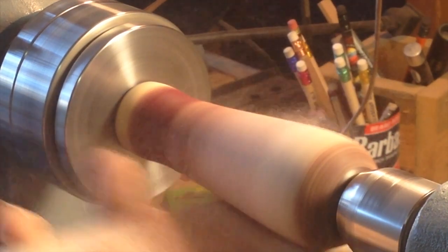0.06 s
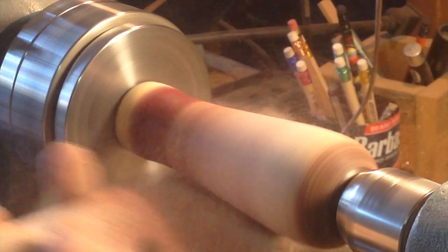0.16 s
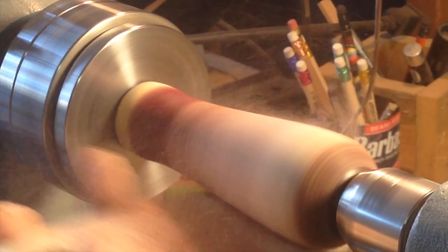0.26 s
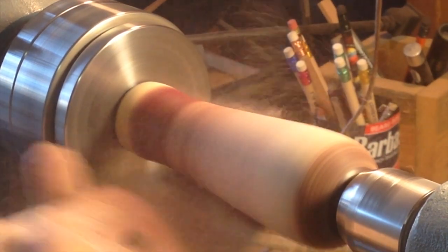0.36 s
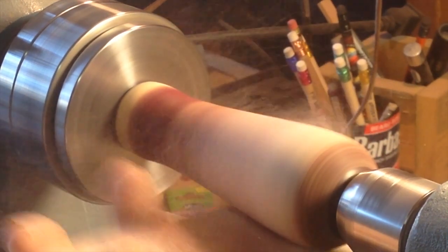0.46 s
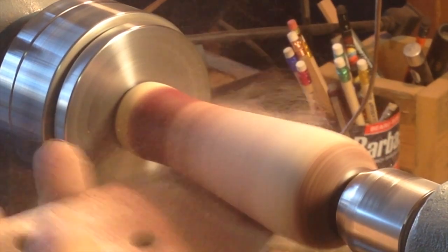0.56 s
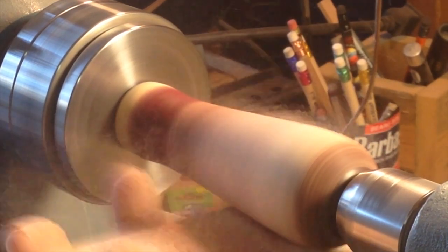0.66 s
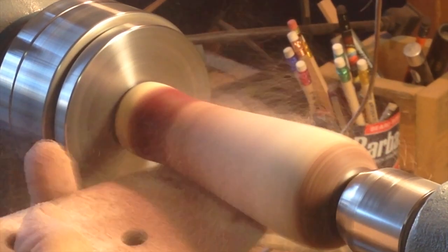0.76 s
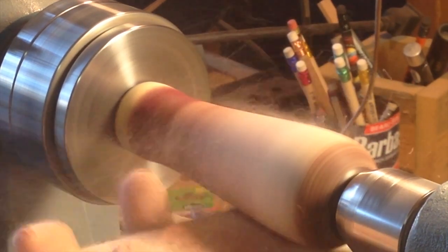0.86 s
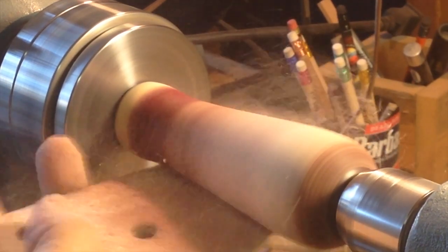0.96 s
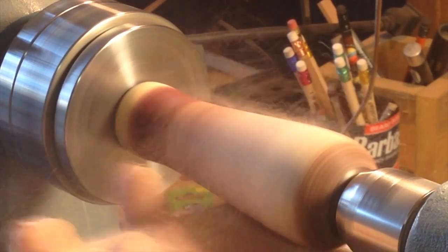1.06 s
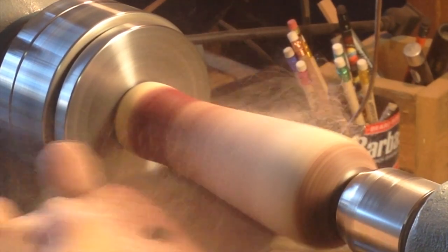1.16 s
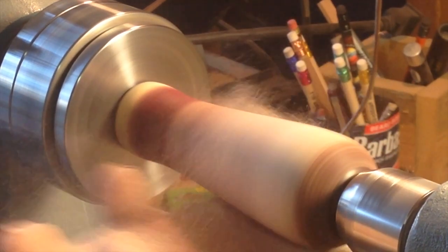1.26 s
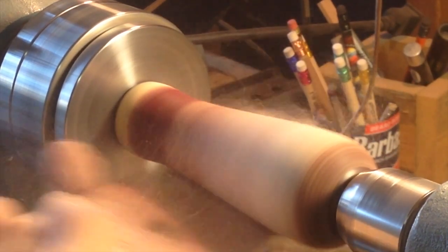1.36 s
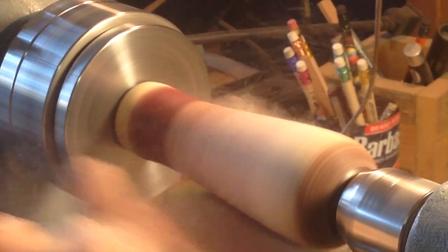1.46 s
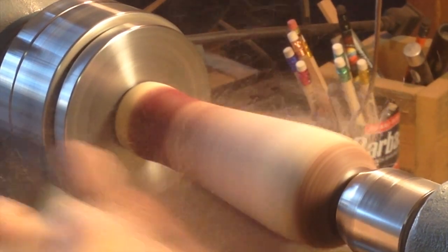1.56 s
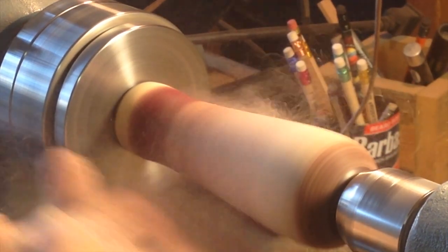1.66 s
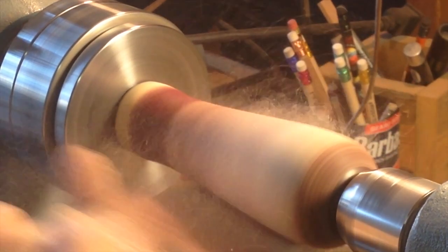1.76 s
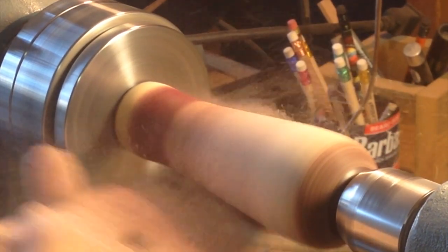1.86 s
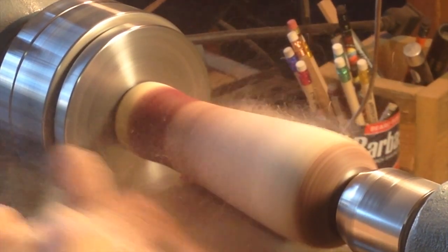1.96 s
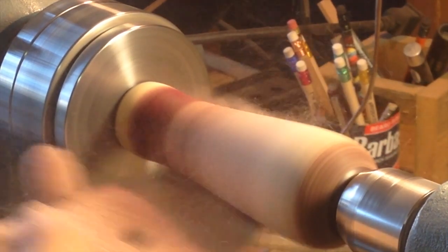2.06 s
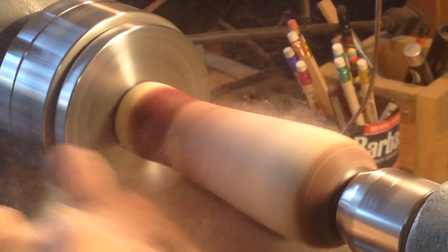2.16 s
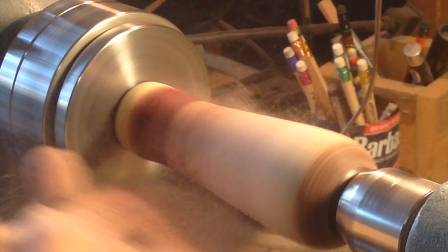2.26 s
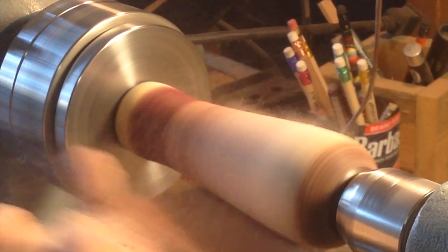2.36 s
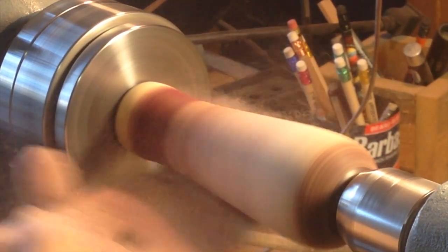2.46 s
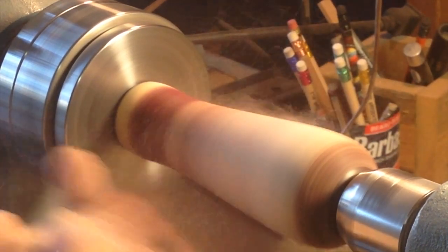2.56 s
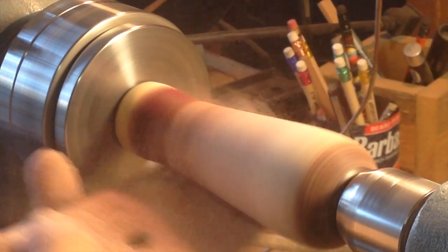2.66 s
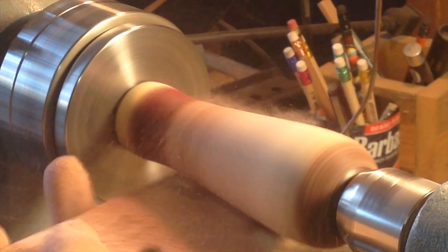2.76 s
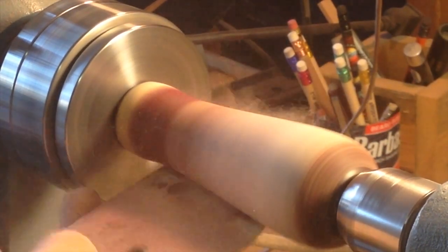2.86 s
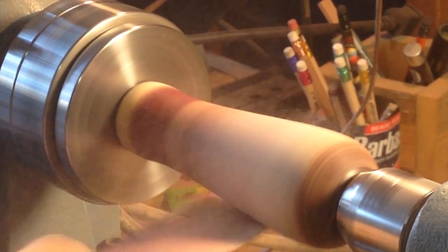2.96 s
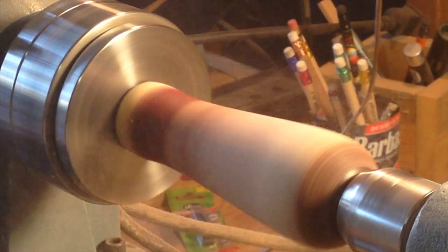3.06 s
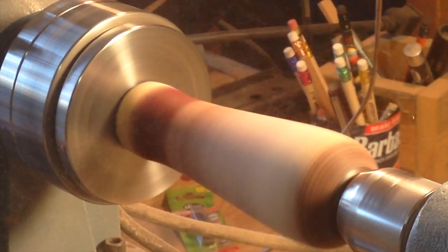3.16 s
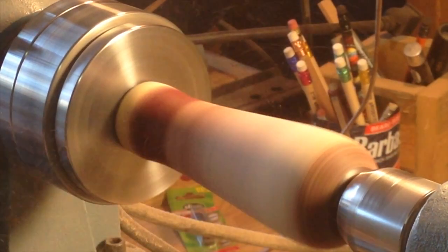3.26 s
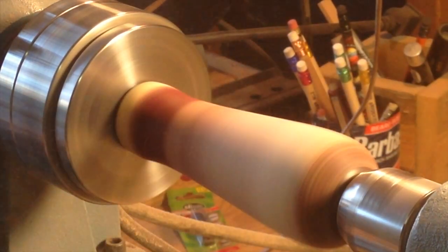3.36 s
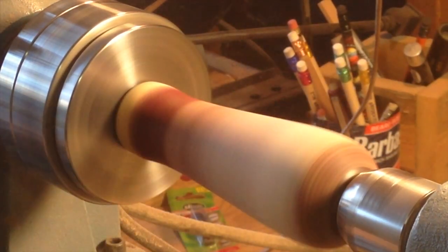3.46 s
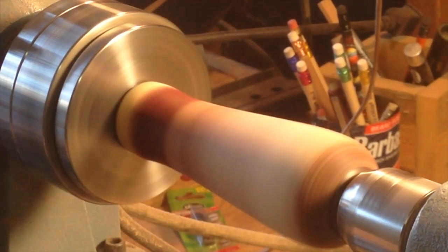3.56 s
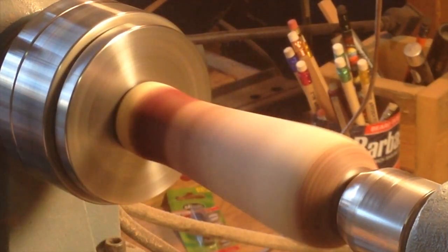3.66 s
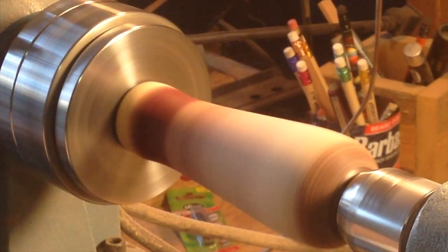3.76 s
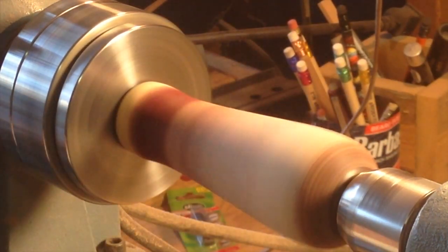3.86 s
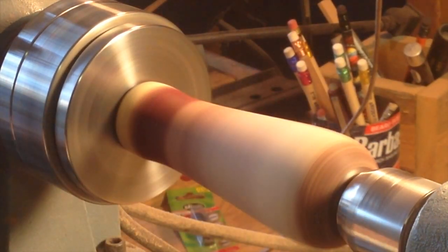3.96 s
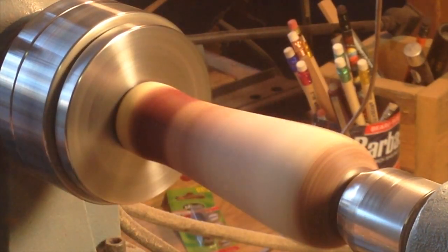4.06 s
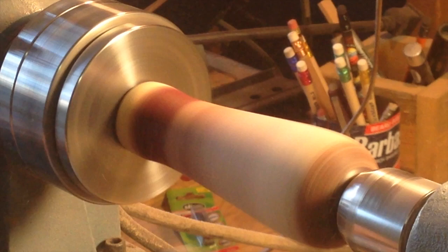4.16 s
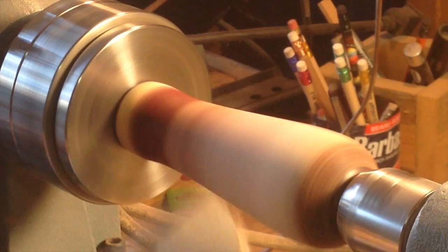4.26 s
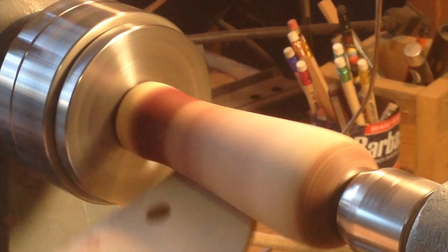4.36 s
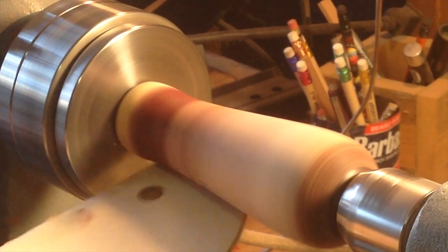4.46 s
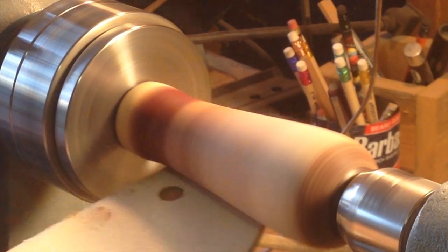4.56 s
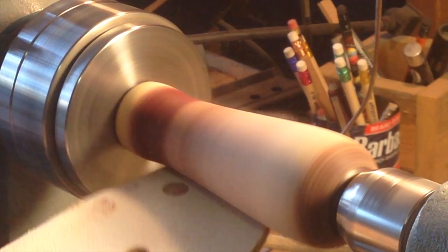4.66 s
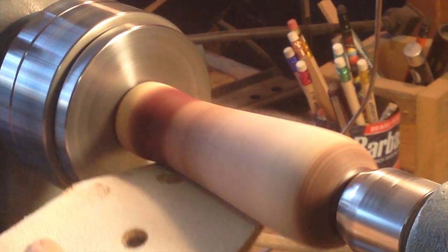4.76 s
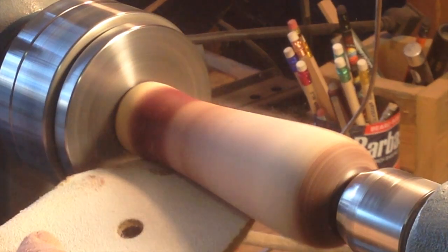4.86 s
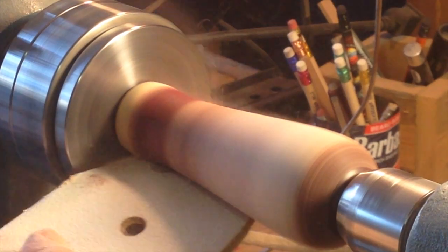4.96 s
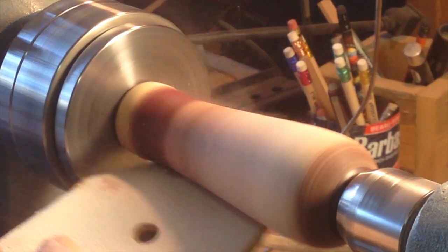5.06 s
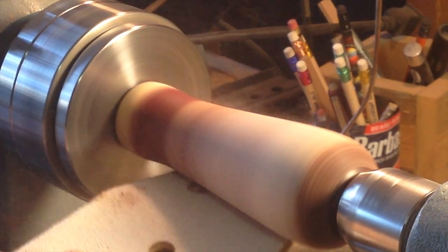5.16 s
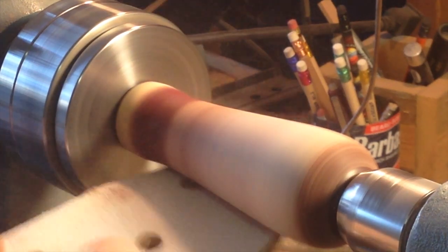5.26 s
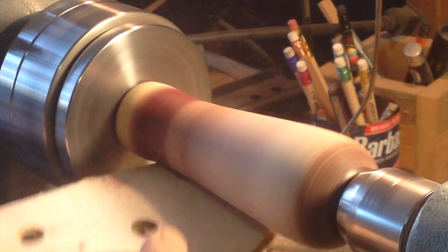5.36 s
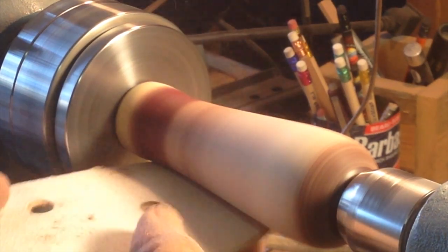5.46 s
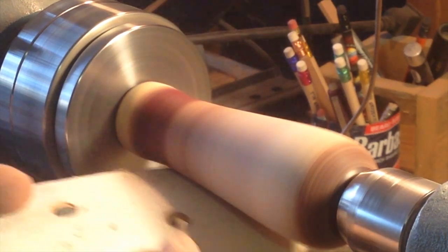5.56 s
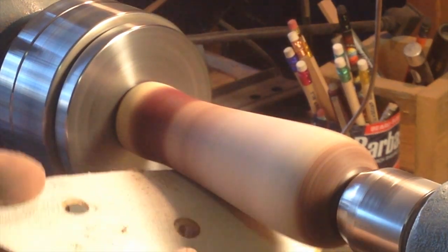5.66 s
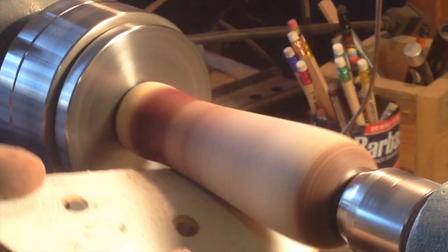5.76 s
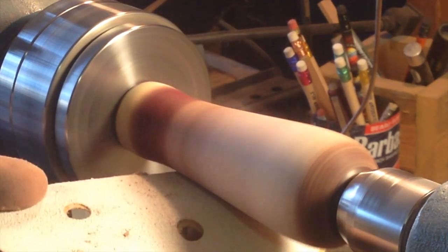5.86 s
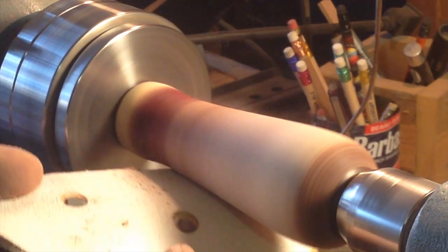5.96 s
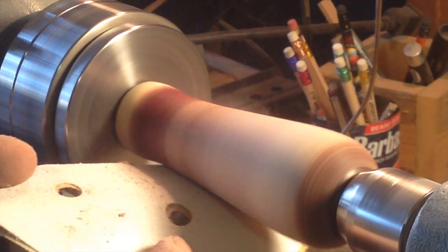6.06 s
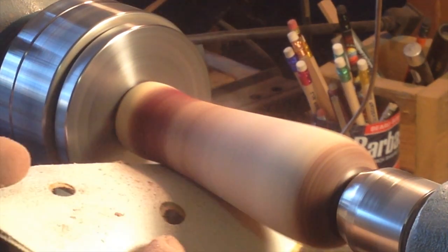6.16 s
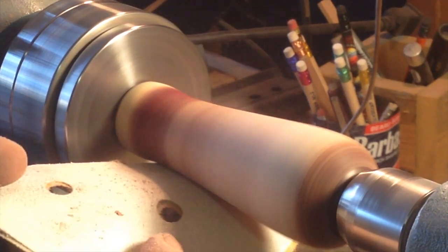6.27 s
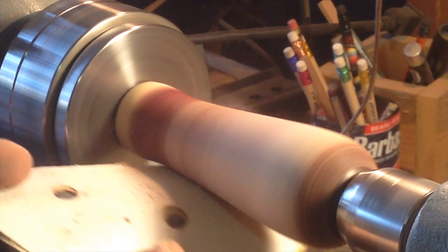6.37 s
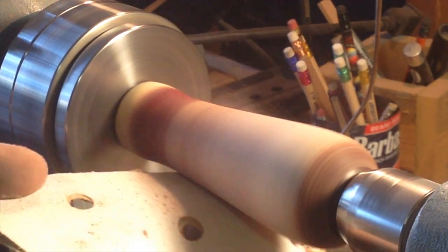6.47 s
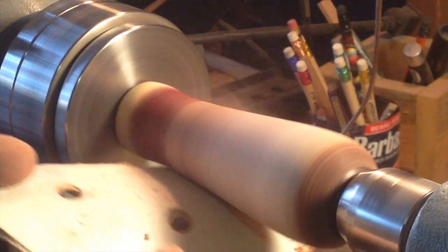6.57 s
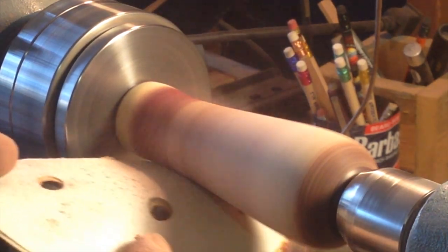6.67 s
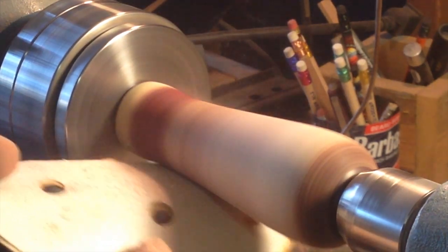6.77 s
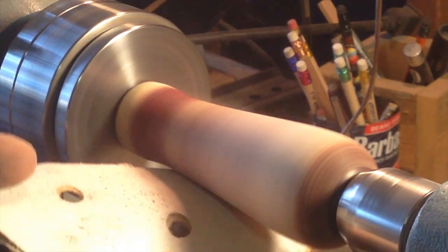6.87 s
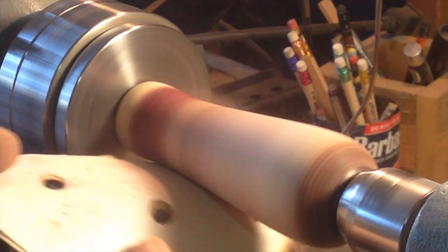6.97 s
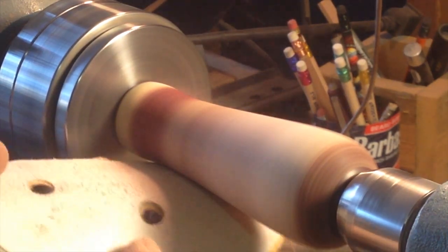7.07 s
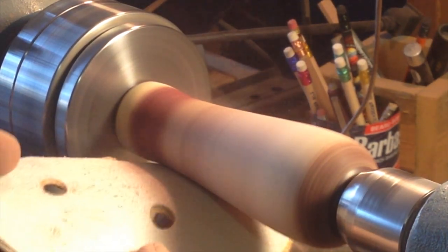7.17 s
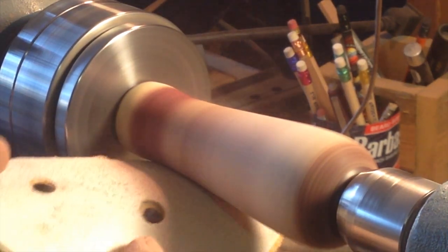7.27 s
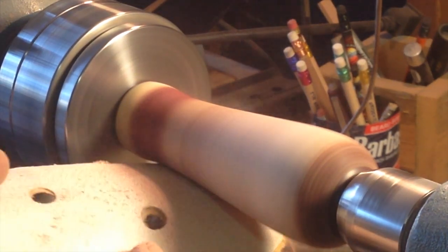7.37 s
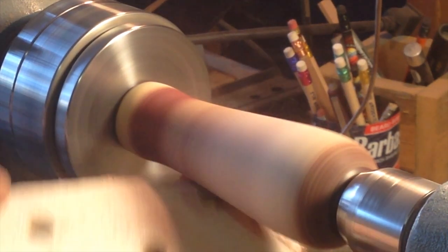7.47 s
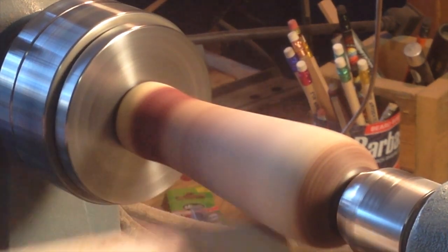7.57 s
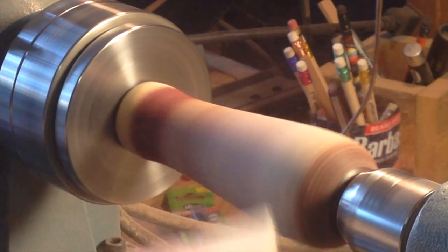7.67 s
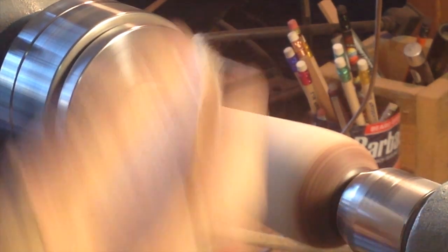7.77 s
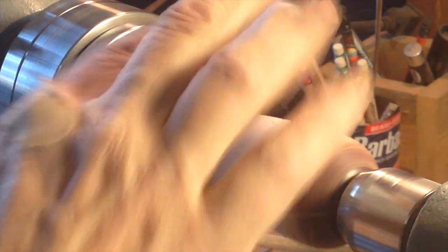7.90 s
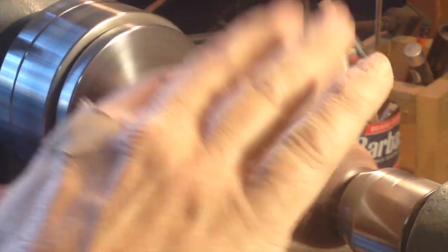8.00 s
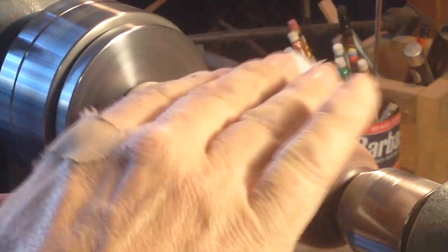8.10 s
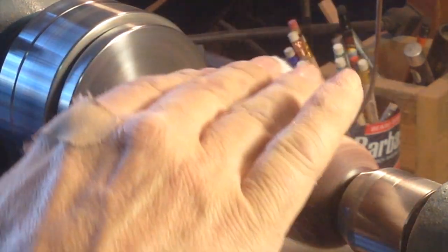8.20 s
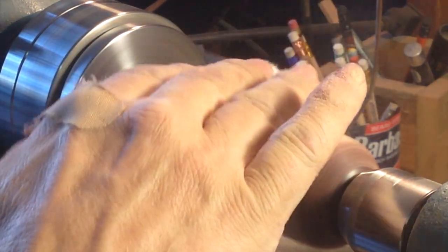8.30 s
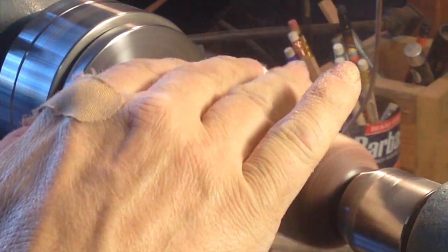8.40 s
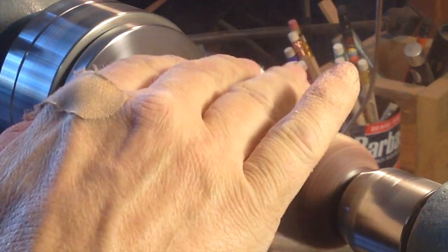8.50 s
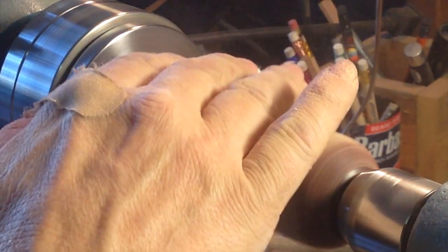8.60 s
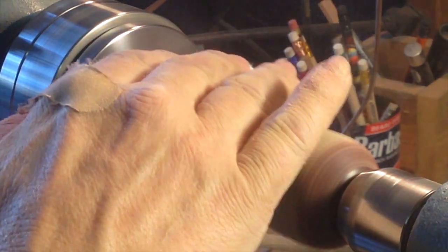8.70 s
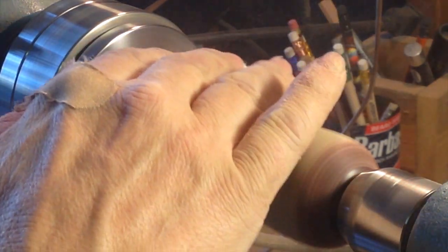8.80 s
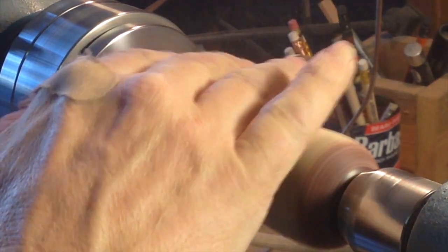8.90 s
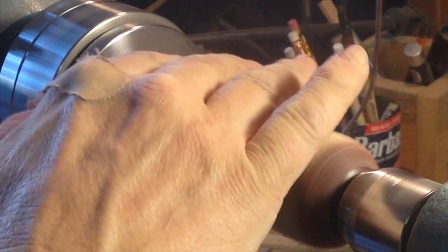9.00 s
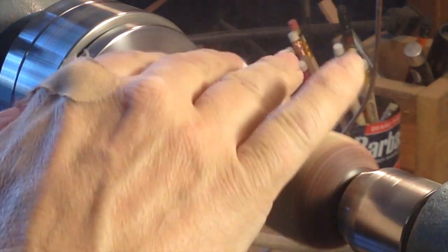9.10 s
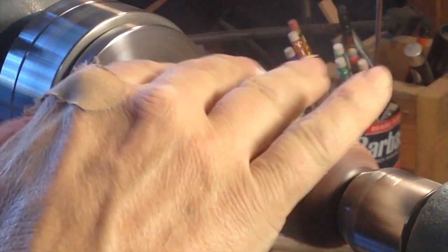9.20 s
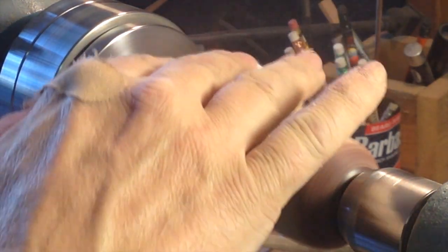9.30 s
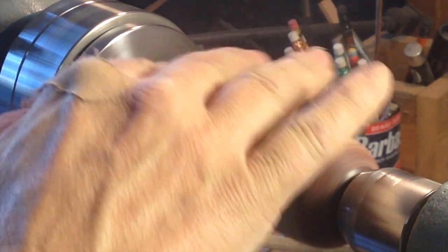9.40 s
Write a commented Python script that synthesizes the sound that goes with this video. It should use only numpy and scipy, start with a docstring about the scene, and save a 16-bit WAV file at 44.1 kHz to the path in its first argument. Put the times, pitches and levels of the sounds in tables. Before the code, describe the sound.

A wood lathe runs throughout, heard close in a small workshop with little echo. Its motor hums, the belt and spindle drone, and a loose pulley makes a rapid, ringing knock that swells about once a second. From the start, sandpaper hisses brightly and steadily against a spinning wooden handle, lifting off at about 3 seconds to leave only the machine. At 4.4 seconds it returns with a few small scrapes and the loudest, roughest rasp, its backing board juddering, with a sharp tick and a jolt near 5 seconds. From 5.5 to 7.7 seconds the sanding is lighter, swelling as the hand pushes, and ends with a short scrape. At about 8.1 seconds the paper comes back wrapped under a palm, making a softer, duller hiss that rises and falls until the end, around 9.4 seconds.

```python
"""A wood lathe runs throughout in a small workshop: the motor hums, the spindle and belt drone, and a
loose pulley knocks once a motor turn, swelling about once a second. From the start, sandpaper held
under a spinning handle hisses as its grains scratch the wood; it lifts off at about 3 s.
At 4.4 s it returns on a juddering backing board, pressed firmly, then lightly from 5.5 to 7.7 s.
From 8.1 s to the end it is wrapped under the palm."""
import sys
import numpy as np
from scipy import signal
from scipy.fft import rfft, irfft, next_fast_len
from scipy.io import wavfile
from scipy.ndimage import map_coordinates

SR = 44100
rng = np.random.default_rng(int(sys.argv[2]) if len(sys.argv) > 2 else 0)


def inscribe(sig):
    """Save sig as 16-bit PCM at rate SR to the path in sys.argv[1].

    A 1-D sig is mono; a 2-D sig holds one channel per row.
    Samples are clipped to [-1, 1] before scaling.
    """
    pcm = np.round(np.clip(np.atleast_2d(sig).T, -1, 1) * 32767)
    wavfile.write(sys.argv[1], SR, pcm.astype(np.int16))


N = 416291
T = np.arange(N) / SR

MAINS_HZ, MOTOR_HZ, SPINDLE_HZ = 59.935, 29.707, 22.33
TREBLE_LIMIT_HZ = 15350

# the rush of bearings and moving air: pitch_hz, relative_db
AIR_SPECTRUM = [(15, -34), (30, -5), (55, -25), (110, 3), (200, -5.5), (330, 0), (500, -8), (850, -13),
                (1700, -11.5), (2300, -16.5), (4000, -19.5), (6500, -27.5), (10000, -32), (15000, -38)]
# the slow drift of the motor's magnetic hum: time_s, level_db
HUM_LEVELS = [(0.0, -41), (2.7, -41.5), (4.8, -42.3), (7.1, -42.5), (7.7, -39.5), (9.44, -40.5)]
# spells in which the frame buzzes: start_s, length_s, level_db
BUZZ_SPELLS = [(-0.15, 3.5, -49.5), (3.322, 1.82, -41.5), (5.384, 0.85, -43.5), (6.22, 1.4, -48),
               (7.85, 0.63, -43.5), (8.444, 1.1, -48)]
# tones of the belt and motor fan: pitch_hz, level_db
BELT_AND_FAN_TONES = [(74.4, -67.5), (163.7, -62.5), (178.4, -66), (892, -82), (921.8, -65), (981.3, -67.5),
                      (1011.5, -60)]
# the spindle's drone: multiple_of_speed, level_db
SPINDLE_TONES = [(2, -63), (3, -58), (4, -65), (6, -50), (8, -64), (10, -64), (11, -48), (12, -52),
                 (13, -59), (14, -58), (15, -55), (16, -60), (17, -55), (18, -59), (19, -58), (20, -62),
                 (22, -65), (24, -69)]
# moments when the pulley's knock dies down: time_s
KNOCK_LULLS = [-0.14, 0.74, 1.54, 2.35, 3.24, 4.42, 5.43, 6.40, 7.28, 8.27, 9.21, 10.1]
# tones the slipping pulley rings in the lathe's body: pitch_hz, relative_db
BODY_TONES = [(670, -6), (1010, -10.5), (1250, -25.5), (1352, 2), (1460, -7), (1578, -2), (1715, -2),
              (1888, -0.5)]
# how strongly the lathe sings between knocks, compared with the knock: time_s, relative_db
SING_LEVELS = [(0, -7), (3.1, -5.5), (3.5, -9), (7, -11), (9.4, -8.5)]
# the pulley's own ringing tones, each with its time to fade by 60 dB: pitch_hz, relative_db, ring_s
PULLEY_TONES = [(1900, -2, .03), (2130, -3, .035), (2540, -3, .025), (3350, 1, .02), (3790, -4, .015),
                (3990, -2, .028), (5000, -8, .01), (5550, 0, .015)]
# the four holds of the paper (underneath, firm on the board, light on the board, under the palm):
# start_s, length_s, rise_s, release_s, hiss_db, rasp_db
PAPER_HOLDS = [(-0.1, 3.226, .05, 0.2, -26.5, -37), (4.385, 1.109, .29, 0.26, -21, -30.5),
               (5.464, 2.235, 0.045, 0.22, -32.5, -38), (8.072, 1.57, 0.056, .1, -37.3, -43)]
# the hand pushes harder or falters: start_s, length_s, extra_hiss_db, extra_rasp_db
HAND_PUSHES = [(-0.05, 0.24, 0.5, 2.5), (1.793, 0.23, 1, -0.2), (2.77, .15, 1, 0.8), (4.402, 0.083, 5, 2),
               (4.49, .11, -2.5, -1.5), (4.6, 0.45, -0.7, 3), (4.794, 0.15, 2.5, -1.2),
               (5.18, 0.094, 1.3, 1), (5.618, .08, 2, 0), (5.914, 0.19, 8, 5.5), (6.13, 0.59, 3.8, 3.5),
               (6.775, 0.4, 3.2, 3), (7.605, 0.053, 2.5, 0.5), (8.118, 0.58, 9, 3.5), (8.126, 0.38, 1.1, 5),
               (9.038, 0.097, 5, 2.5), (9.248, .14, 4.5, 6)]
# the rumble of the backing board: pitch_hz, relative_db
JUDDER_SPECTRUM = [(100, -26), (330, 4), (600, -34), (1100, -12), (2500, -6), (4000, -12)]
# coarse grains and paper edges catch: start_s, peak_db, pitch_hz, decay_s
GRAIN_CATCHES = [(2.928, -27.5, 1800, 0.015), (4.416, -27, 8000, .006), (4.549, -24, 7000, 0.0089),
                 (4.993, -7, 7000, 0.00045), (5.491, -30, 8000, .006), (7.618, -22.5, 9000, .012),
                 (8.078, -27, 7000, .006)]
# grit scraping wood: pitch_hz, relative_db
GRIT_SPECTRUM = [(150, -30), (500, -15.5), (1000, -32.5), (2000, -13), (3000, -10.5), (4000, -6.5),
                 (6000, -5.5), (7500, 0.5), (9500, 1), (13000, 1), (15200, -0.5)]
# pitches that the paper and its backing boost, one table for each hold: pitch_hz, width_hz, boost_db
UNDERNEATH_PEAKS = [(2860, 77, 5), (3960, 740, 2), (4750, 96, 4), (6820, 280, 2.5)]
FIRM_BOARD_PEAKS = [(3160, 340, 3.7), (4020, 950, 10), (5170, 280, 6), (6370, 1400, 3.4), (7820, 700, 5.6),
                    (9160, 1200, 3.3), (12020, 1200, 2)]
LIGHT_BOARD_PEAKS = [(850, 380, 12), (2420, 95, 5.4), (3270, 450, 3.3), (3980, 700, 8), (5170, 1300, 1.6),
                     (5920, 260, 3.7), (7750, 2100, 2.8)]
PALM_PEAKS = [(2430, 300, 4.5), (3420, 500, 6), (4100, 440, 4), (5000, 870, 5), (6670, 1300, 6),
              (8960, 1200, 2.5)]


def gain_of(db):
    """Turns decibels into a number to multiply a sound by."""
    return 10 ** (np.asarray(db) / 20)


def evened(x):
    """Scales a signal to an average (rms) strength of one."""
    return x / np.sqrt(np.mean(x ** 2) + 1e-20)


def ramp(x):
    """Follows x from zero to one, and goes no further either way."""
    return np.clip(x, 0, 1)


def curve(rows):
    """Joins a table's points in time with straight lines."""
    return np.interp(T, *np.transpose(rows))


def db_at_pitch(spectrum, hz):
    """Looks up a level between the pitches of a table."""
    pitches, db = np.transpose(spectrum)
    return np.interp(np.log(hz + 1), np.log(pitches), db)


def coloured(x, db_at):
    """Turns each pitch in x up or down by db_at(hz), then evens the strength to one."""
    size = next_fast_len(len(x))
    gains = gain_of(db_at(np.fft.rfftfreq(size, 1 / SR)))
    return evened(irfft(rfft(x, size) * gains, size)[:len(x)])


def noise(spectrum):
    """Noise with the given balance of low and high pitches."""
    return coloured(rng.standard_normal(N), lambda hz: db_at_pitch(spectrum, hz))


def wander(rate_hz):
    """A random drift that heads for a new value rate_hz times a second."""
    points = rng.standard_normal(8192)
    return evened(np.interp(T * rate_hz, np.arange(len(points)), points))


def tone(cycles, db):
    """A pure tone of the given rms level that starts anywhere in its cycle."""
    return np.sqrt(2) * gain_of(db) * np.sin(2 * np.pi * (cycles + rng.random()))


def workshop_echo(sound, ring_s=0.11, level_db=-14, echoes_per_s=2000):
    """The bench and walls send back short, faint echoes."""
    t = np.arange(SR // 4) / SR
    echoes = rng.choice([-1., 1.], len(t)) * (rng.random(len(t)) < echoes_per_s / SR)
    echoes *= (t > .003) * gain_of(-60 * t / ring_s)
    return gain_of(level_db) * signal.oaconvolve(sound, echoes / np.linalg.norm(echoes))[:N]


def air_rush(level_db=-45.5):
    """Bearings and moving air make a steady rush."""
    return gain_of(level_db) * noise(AIR_SPECTRUM)


def frame_buzz_db(fade_s=.36, rest_db=-65):
    """How loudly the frame buzzes: each spell fades in and out above a faint resting level."""
    spells = np.zeros(N)
    for start, length, db in BUZZ_SPELLS:
        fade = ramp(np.minimum(T - start, start + length - T) / fade_s)
        spells += gain_of(db) * np.sin(np.pi / 2 * fade)
    return 20 * np.log10(np.maximum(spells, gain_of(rest_db)))


def motor(swell_hz=0.91, swell_db=2, crest_s=0.54):
    """The motor's magnetism hums at twice the mains frequency; the frame buzzes at four times it."""
    # the rotor slips behind the mains, so the hum swells about once a second
    hum_db = curve(HUM_LEVELS) + swell_db * np.cos(2 * np.pi * swell_hz * (T - crest_s))
    buzz_db = frame_buzz_db()
    rattle_db = -66 + 1.03 * (buzz_db - buzz_db.mean()) + 3 * wander(12)
    db_by_multiple = {2: hum_db, 4: buzz_db, 6: -61, 10: -68, 12: rattle_db}
    return sum(tone(multiple * MAINS_HZ * T, db) for multiple, db in db_by_multiple.items())


def belt_and_fan(waver_db=0.8, drift_cycles=0.058):
    """The belt and motor fan whine, wavering in pitch and loudness."""
    return sum(tone(hz * T + drift_cycles * wander(8.3), db + waver_db * wander(7))
               for hz, db in BELT_AND_FAN_TONES)


def spindle(turns, waver_db=0.14, throb=0.39):
    """The spindle drones at whole multiples of its turning speed."""
    buzz_db = frame_buzz_db()
    # one tone lies six hertz from the frame's buzz: it swells with it, and the two throb together
    beside_buzz = round(4 * MAINS_HZ / SPINDLE_HZ)
    swell_db = throb * np.maximum(buzz_db - np.median(buzz_db), 0)
    return sum(tone(multiple * turns, db + waver_db * wander(4.2) + (multiple == beside_buzz) * swell_db)
               for multiple, db in SPINDLE_TONES)


def knock_force(peak_db=-42.5, lull_db=-55):
    """The pulley's knock swells and falls in one arch from each lull to the next."""
    lulls_passed = np.interp(T, KNOCK_LULLS, np.arange(len(KNOCK_LULLS)))
    arch = abs(np.sin(np.pi * lulls_passed)) ** 1.17
    return gain_of(lull_db) + (gain_of(peak_db) - gain_of(lull_db)) * arch


def pulley_clack(blows):
    """Blows ring the pulley; each is shared among its tones a little differently."""
    t = np.arange(SR // 8) / SR
    out = np.zeros(N)
    for hz, db, ring_s in PULLEY_TONES:
        ringing = gain_of(db - 60 * t / ring_s) * np.sin(2 * np.pi * hz * t)
        out += signal.oaconvolve(blows * (1 + .25 * rng.standard_normal(N)), ringing)[:N]
    return evened(out)


def pulley(first_s=.0286, slip_s=.0085, fade_s=.005, chatter_s=0.019, sing_hz=1577, clack_db=-53.5):
    """Once a motor turn the loose pulley knocks, then slips briefly and sets the lathe ringing."""
    since = (T - first_s) % (1 / MOTOR_HZ)
    force = knock_force()
    # the slip keeps the lathe's body ringing, starting alike on every turn
    slip = evened((1 - np.exp(-since / 0.00053)) * np.exp(-np.maximum(since - slip_s, 0) / fade_s))
    squeak = sum(gain_of(db) * np.sin(2 * np.pi * hz * since + 0.5 * wander(60))
                 for hz, db in BODY_TONES)
    scrape = coloured(rng.standard_normal(N),
                      lambda hz: db_at_pitch(BODY_TONES, hz) - 40 * (abs(hz - 1350) > 850))
    body = gain_of(-4.5) * force * slip * evened(evened(squeak) + 0.25 * scrape)
    # one of the body's tones sings on between knocks
    sing = force * tone(sing_hz * T + 0.16 * wander(15), curve(SING_LEVELS) - 1)
    first_contact = np.diff(since, prepend=0) < 0
    chatter = 0.065 * np.exp(-since / chatter_s) * rng.standard_normal(N)
    blows = (first_contact + chatter) * evened(force) ** 2.9  # hard knocks clack far more
    return body + sing + gain_of(clack_db) * pulley_clack(blows)


def hand_pressure(hold, touch_hiss_db=-47.5, touch_rasp_db=-47, land_s=0.009, leave_s=0.033):
    """Strength of hiss and rasp in one hold: the paper lands, is pressed, eases off and lifts."""
    start, length, rise, release, pressed_hiss_db, pressed_rasp_db = hold
    since, left = T - start, start + length - T
    pressed = ramp(np.minimum(since / rise, left / release))
    hiss_db = touch_hiss_db + (pressed_hiss_db - touch_hiss_db) * pressed
    rasp_db = touch_rasp_db + (pressed_rasp_db - touch_rasp_db) * pressed
    for push_start, push_length, extra_hiss_db, extra_rasp_db in HAND_PUSHES:
        if start <= push_start < start + length:
            # a push bites at once and relaxes over a share of its own length
            bite = (1 + np.tanh((T - push_start) / .022)) / 2
            relax = (1 - np.tanh((T - push_start - push_length) / (.12 * push_length))) / 2
            hiss_db += extra_hiss_db * bite * relax
            rasp_db += extra_rasp_db * bite * relax
    touching = ramp(np.minimum(since / land_s, left / leave_s))
    return touching * gain_of([hiss_db, rasp_db])


def board_judder(turns, below_rasp_db=26, jolt_s=5.03, jolt_width_s=.05):
    """The backing board rumbles against the wood as hard as it is pressed, and jolts once."""
    rasp_gain = sum(hand_pressure(hold)[1] for hold in PAPER_HOLDS[1:3])
    jolt = gain_of(-32.5) * np.exp(-((T - jolt_s) / jolt_width_s) ** 2)
    twice_a_turn = 1 + 0.29 * np.cos(4 * np.pi * turns)
    return (gain_of(-below_rasp_db) * rasp_gain + jolt) * noise(JUDDER_SPECTRUM) * twice_a_turn


def grain_catches():
    """A coarse grain or a paper edge catches and makes a short scrape."""
    out, t = np.zeros(N), np.arange(SR // 16) / SR
    for start_s, peak_db, pitch_hz, decay_s in GRAIN_CATCHES:
        scrape = coloured(rng.standard_normal(len(t)), lambda hz: -7 * np.log2((hz + 1) / pitch_hz) ** 2)
        scrape *= np.exp(-t / decay_s)
        first = round(start_s * SR)
        out[first:first + len(t)] += gain_of(peak_db) * scrape / abs(scrape).max()
    return out


def with_drifting_ripple(sound, share=.16, delay_s=.0016, sway_s=.0001):
    """A faint copy with a swaying delay makes a fine ripple drift through the hiss."""
    earlier_s = T - delay_s - sway_s * wander(4)
    return sound + share * map_coordinates(sound, [earlier_s * SR], order=3)


def sanding(hold, peaks, turns, tilt_db_per_octave, wobble, flutter_db, grain_share=.45, split_hz=5800):
    """Countless grains scratch the wood; the slightly oval handle presses the paper twice a turn."""
    hiss_gain, rasp_gain = hand_pressure(hold)
    touching = hiss_gain > 0
    grain_db = 2.1 * np.minimum(rng.exponential(1, N), 4)
    grains = gain_of(grain_db) * (rng.random(N) < grain_share)
    oval = 4 * np.pi * turns
    bumps = np.cos(oval) + 0.24 * np.cos(2 * oval) + 0.33 * np.cos(3 * oval)
    contact = (1 + wobble * bumps) * gain_of(flutter_db * wander(24) + 0.56 * wander(500))
    scratches = (grains * rng.choice([-1, 1], N) * contact)[touching]

    def colour_db(hz):
        boosts = sum(db / (1 + (2 * (hz - pitch) / width) ** 2) for pitch, width, db in peaks)
        tilt = tilt_db_per_octave * np.log2(hz + 1)
        return db_at_pitch(GRIT_SPECTRUM, hz) + boosts + tilt - 60 * (hz > TREBLE_LIMIT_HZ)

    # the paper itself hisses above split_hz; its backing rasps below
    hiss = coloured(scratches, lambda hz: colour_db(hz) - 10 * np.log10(1 + (split_hz / (hz + 1)) ** 20))
    rasp = coloured(scratches, lambda hz: colour_db(hz) - 10 * np.log10(1 + (hz / split_hz) ** 20))
    # shift the rasp a quarter cycle, so it neither cancels nor reinforces the hiss
    rasp = signal.hilbert(rasp, next_fast_len(len(rasp))).imag[:len(rasp)]
    out = np.zeros(N)
    out[touching] = hiss_gain[touching] * hiss + rasp_gain[touching] * rasp
    return out


def scene():
    """The running lathe and the four holds of the sandpaper, the same in both ears."""
    turns = SPINDLE_HZ * T + 0.023 * wander(0.783)
    lathe = motor() + belt_and_fan() + spindle(turns) + pulley() + air_rush()
    underneath, firm, light, palm = PAPER_HOLDS
    paper = (
        sanding(underneath, UNDERNEATH_PEAKS, turns, tilt_db_per_octave=1.5, wobble=.027, flutter_db=.93)
        + sanding(firm, FIRM_BOARD_PEAKS, turns, tilt_db_per_octave=1.0, wobble=.071, flutter_db=1.0)
        + sanding(light, LIGHT_BOARD_PEAKS, turns, tilt_db_per_octave=0.6, wobble=.1, flutter_db=.98)
        + sanding(palm, PALM_PEAKS, turns, tilt_db_per_octave=-0.4, wobble=.087, flutter_db=.3))
    direct = lathe + with_drifting_ripple(paper) + board_judder(turns) + grain_catches()
    return np.tile(direct + workshop_echo(direct), (2, 1))


def record(dry):
    """Cuts away the very highest treble."""
    low_pass = signal.firwin(1023, TREBLE_LIMIT_HZ, window=("kaiser", 9), fs=SR)
    return signal.oaconvolve(dry, low_pass[None], "same")


dry = scene()
out = record(dry)
inscribe(out)
```